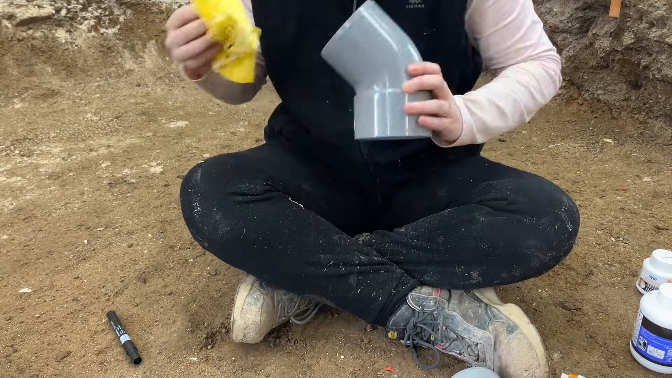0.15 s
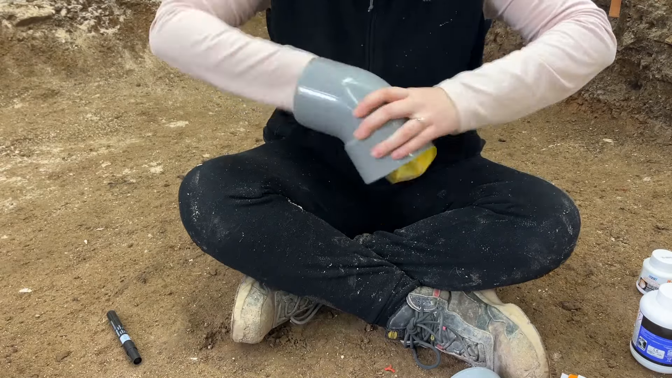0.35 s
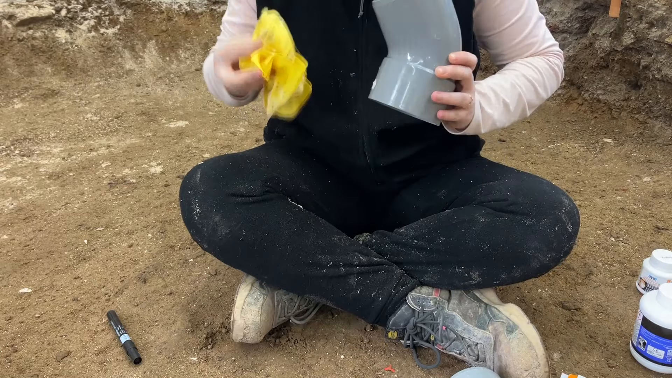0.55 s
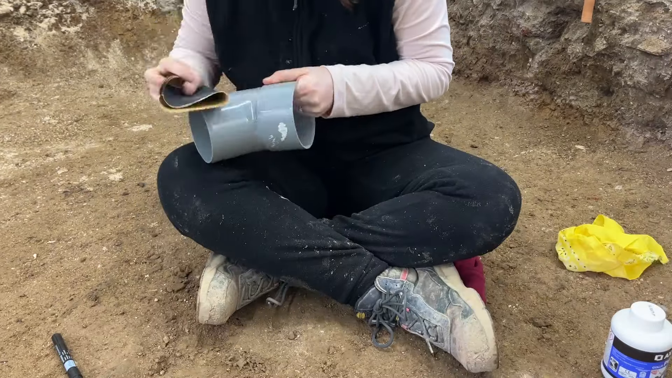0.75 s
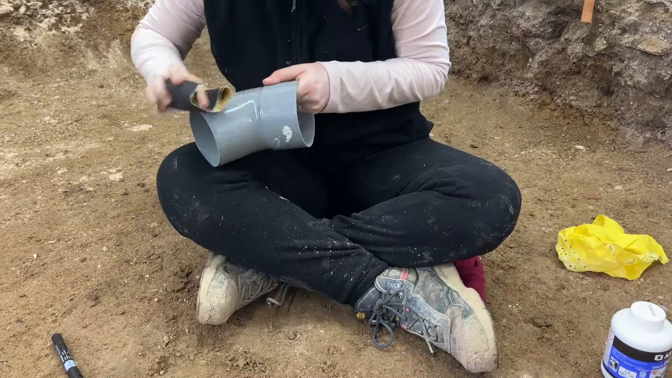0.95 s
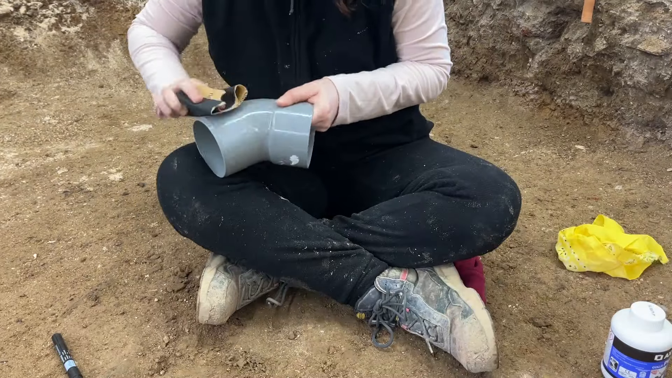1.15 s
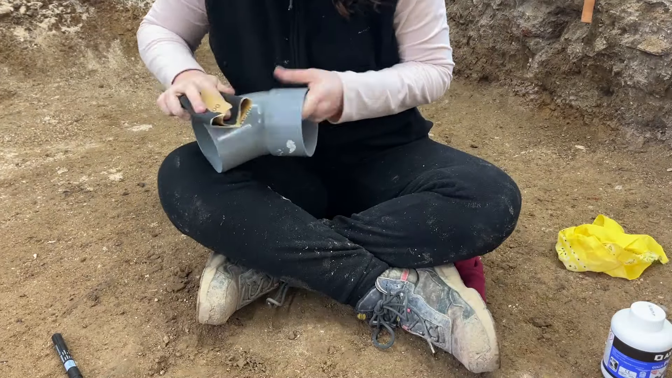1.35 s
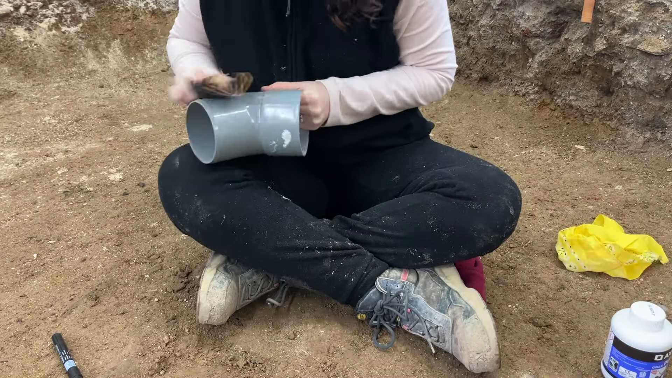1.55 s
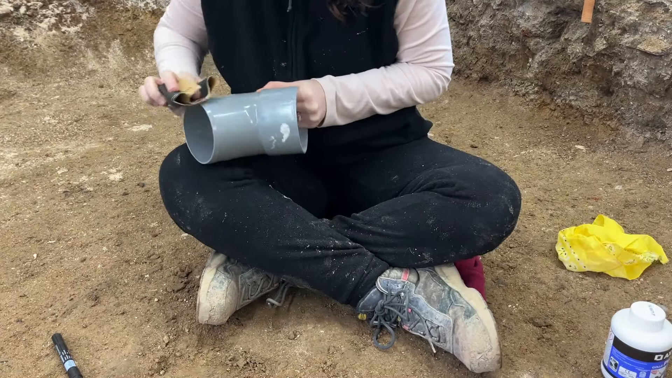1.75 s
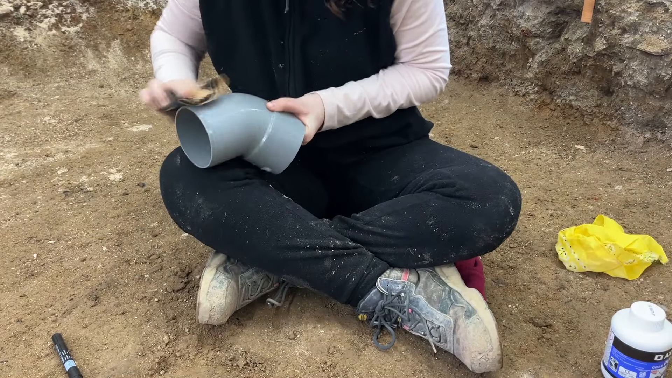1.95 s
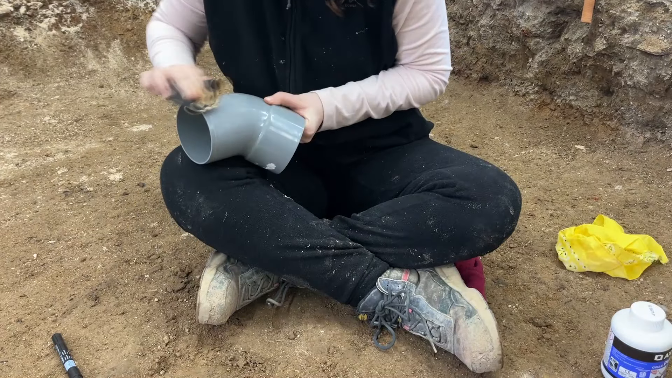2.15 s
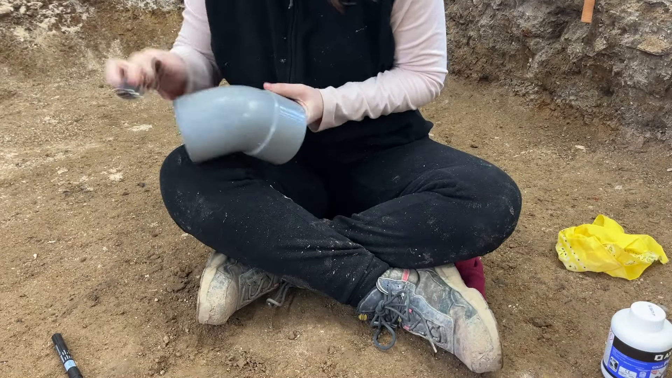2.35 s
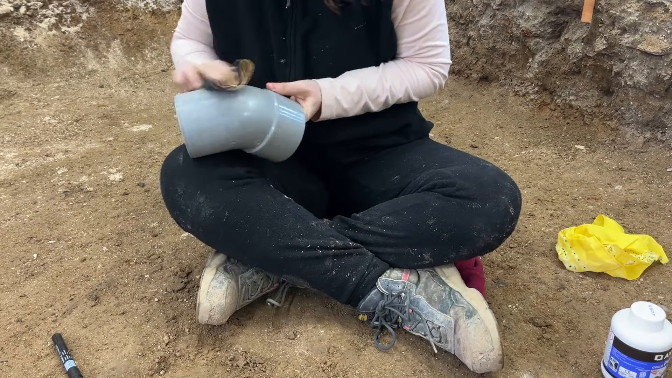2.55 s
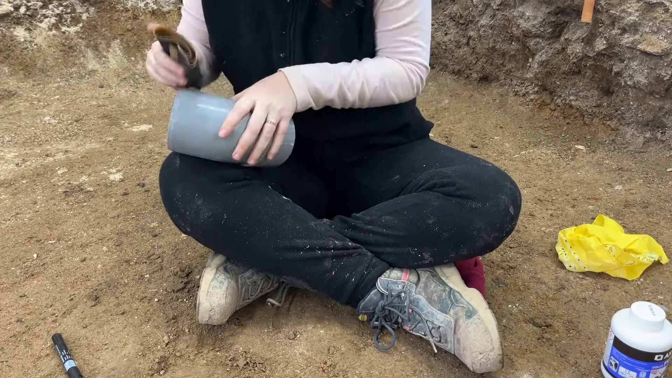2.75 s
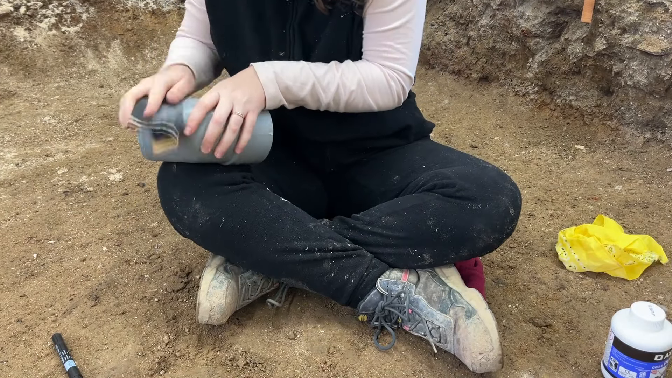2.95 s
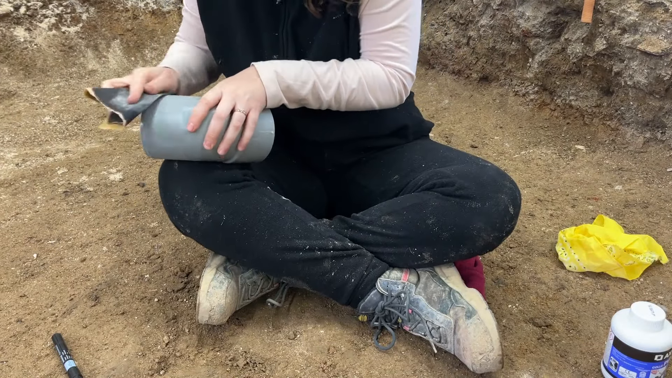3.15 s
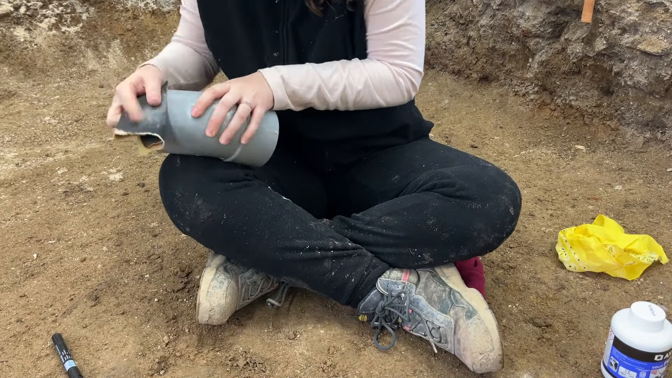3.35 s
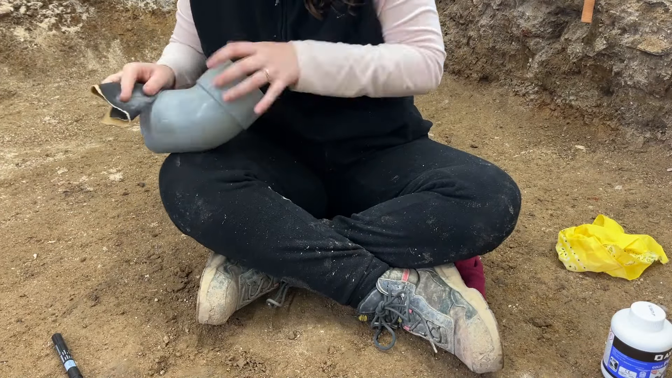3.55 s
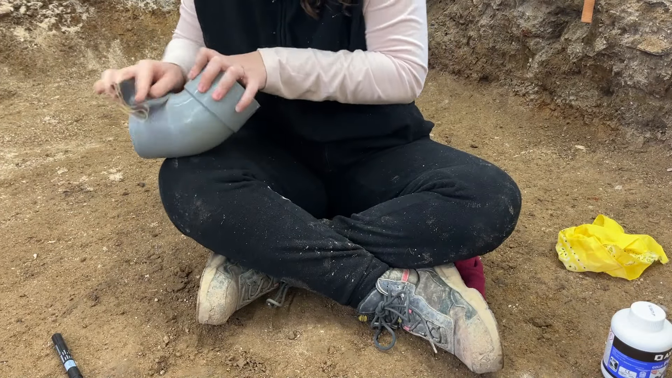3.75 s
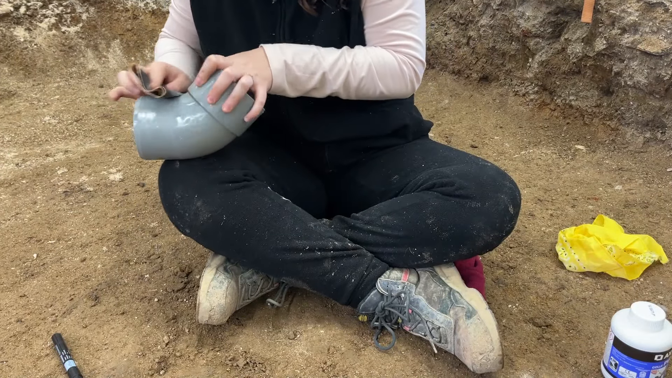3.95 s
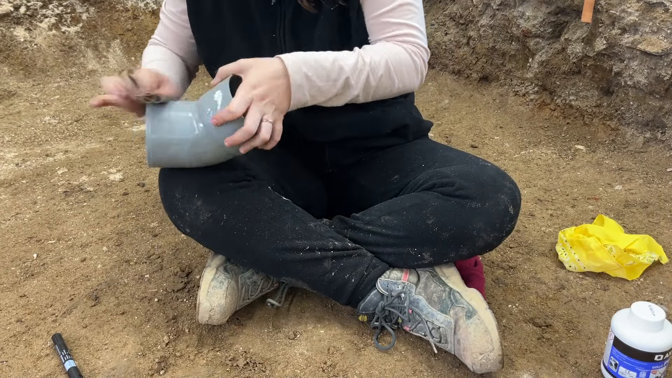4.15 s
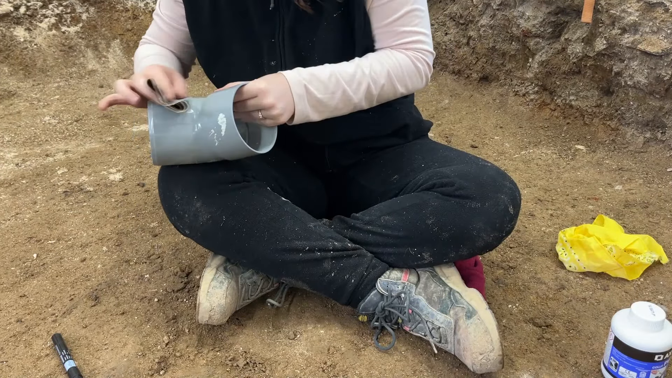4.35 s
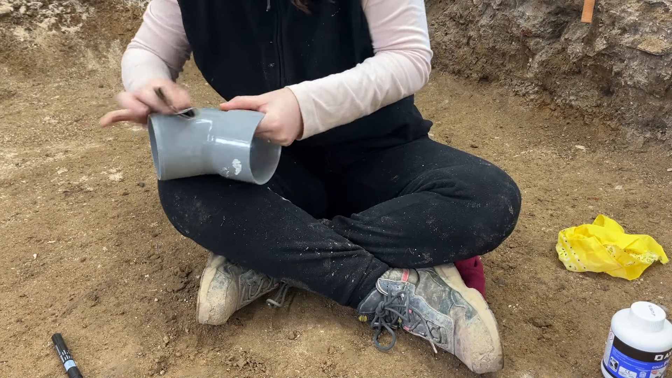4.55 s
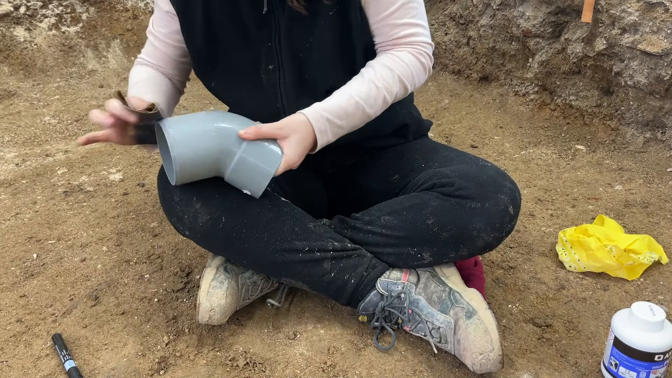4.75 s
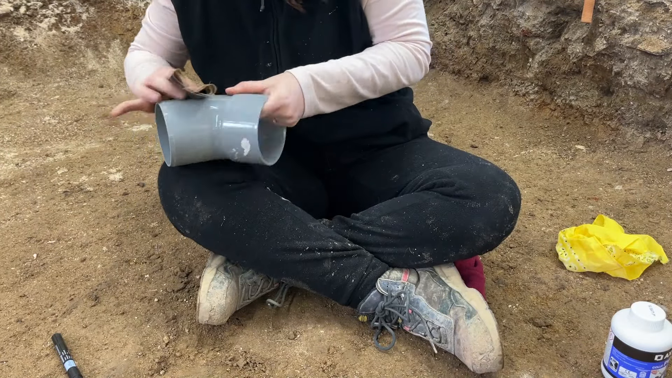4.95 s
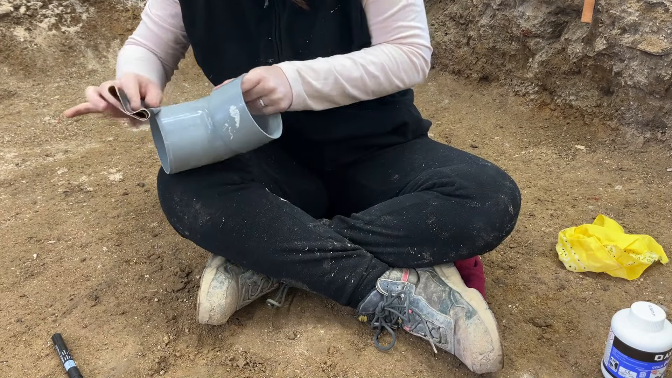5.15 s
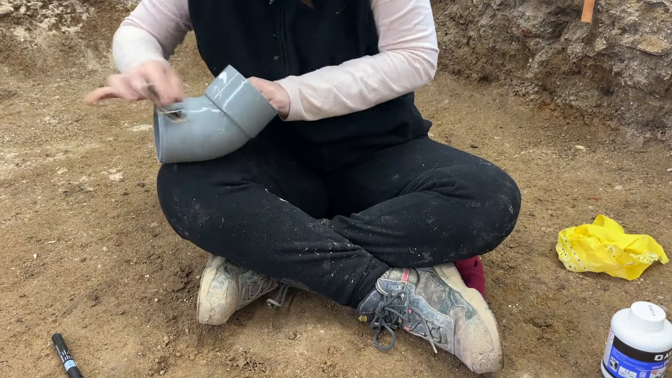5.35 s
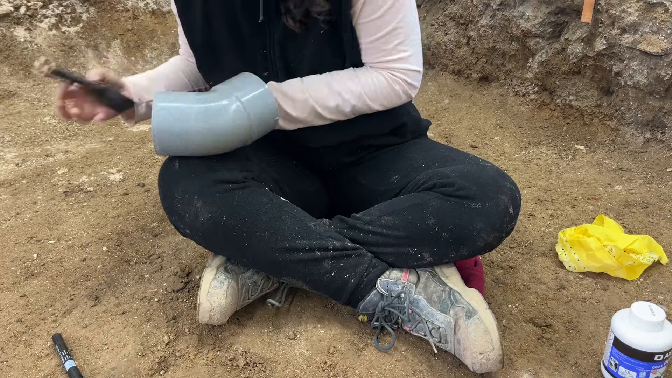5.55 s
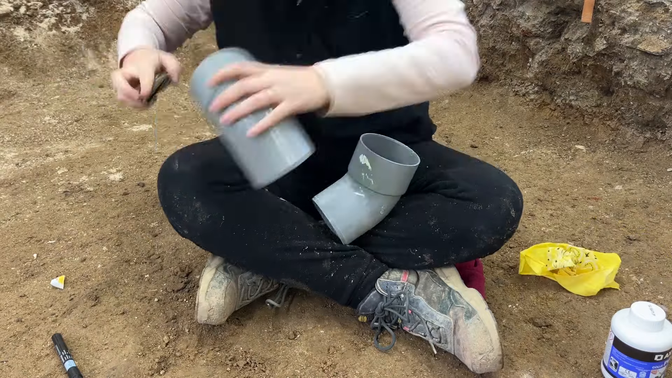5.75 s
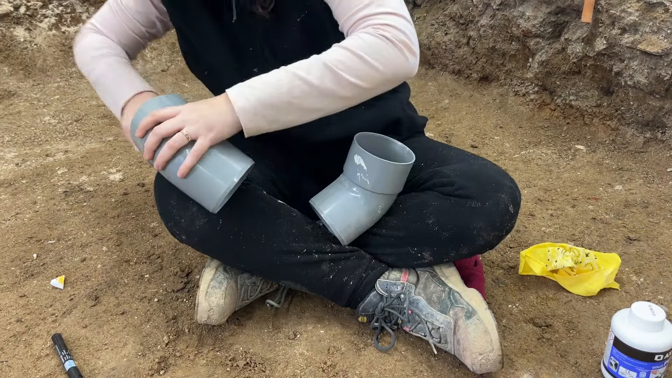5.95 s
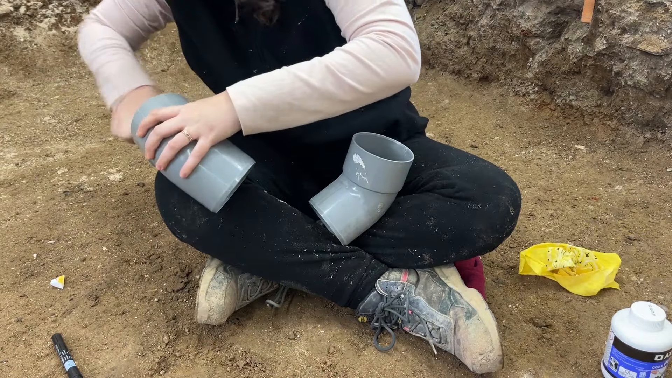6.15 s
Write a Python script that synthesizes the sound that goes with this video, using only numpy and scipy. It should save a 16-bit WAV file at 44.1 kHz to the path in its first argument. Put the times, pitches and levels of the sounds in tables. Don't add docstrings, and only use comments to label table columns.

```python
import sys
import numpy as np
from scipy import signal
from scipy.fft import rfft, irfft
from scipy.io import wavfile
from scipy.ndimage import uniform_filter1d

SR = 44100
rng = np.random.default_rng(int(sys.argv[2]) if len(sys.argv) > 2 else 0)


def wrap_up_sound(samples):
    columns = np.atleast_2d(samples).T
    tamed = np.clip(columns, -1, 1)
    steps = np.round(tamed * 32767).astype(np.int16)
    wavfile.write(sys.argv[1], SR, steps)


def ratio_of_db(decibels):
    return 10 ** (np.asarray(decibels, float) / 20)


N = 277389
TIME = np.arange(N) / SR
HZ = np.fft.rfftfreq(N, 1 / SR)

# f/Hz, level/dB
HUSH_COLOUR = [(100, -4), (200, -3), (400, -4.5), (650, -9.5), (1200, -18), (1500, -14.5), (1850, -14.5),
               (2500, -24), (2900, -28), (15500, -42)]
# f/Hz, level/dB
BUFFET_COLOUR = [(12, -46), (25, 5), (50, 2), (100, 1), (160, -9.5), (300, -23), (600, -69)]
# middle t/s, half length t/s, drone level/dB, drone f/Hz
WIND_GUSTS = [(0.136, 0.074, -46, 62.9), (.4, 0.17, -53.5, 61), (0.824, 0.042, -55, 70.8),
              (1.205, 0.44, -60.5, 64.8), (1.786, 0.084, -48, 66), (2.077, 0.14, -45.5, 64.5),
              (2.263, 0.089, -40, 69.8), (2.502, 0.14, -40, 56.6), (2.74, 0.31, -40, 57.9),
              (2.94, .05, -48.5, 65), (3.21, 0.14, -54, 68.5), (3.413, 0.045, -42, 68.3),
              (3.496, 0.043, -38, 67.36), (3.643, 0.088, -45.5, 63), (3.888, 0.083, -43.5, 68.4),
              (4.05, 0.098, -47, 57.14), (4.164, 0.027, -33, 57.24), (4.252, 0.036, -28.5, 66.8),
              (4.33, 0.019, -35.5, 58.4), (4.451, 0.084, -48.5, 71.1), (4.66, 0.074, -42.5, 70.3),
              (4.792, 0.039, -50, 68.2), (5.261, 0.031, -56, 67.1), (5.522, 0.11, -57.5, 54.5)]
# f/Hz, likeness/0-1, phase lead/rad, level/dB
PORT_DIFFERENCE = [(150, .98, -.1, -1.5), (700, .82, -.1, -4), (1200, .56, -.3, -1.4),
                   (1550, .3, -2.1, -.8), (1900, .9, -.15, -.3), (3100, .66, -1.25, -3.5),
                   (4000, .57, -.35, -6), (5000, .57, .1, -5.6), (5700, .71, 1.1, -5),
                   (6700, .77, 1.5, -1.5), (8400, .93, 3.14, 0), (10200, .76, 4.85, 0),
                   (11800, .93, 6.28, 0), (13600, .76, 7.7, 0), (15400, .93, 9.42, 0)]
# f/Hz, width/Hz, level/dB
HOLLOW_MODES = [(700, 120, 0), (1320, 170, -4), (2270, 250, -9)]
# t/s, peak level/dB, favoured f/Hz, reach/octaves
ELBOW_KNOCKS = [(0.335, -50, 1320, 3.2), (0.423, -57, 600, 0.6), (0.685, -46.5, 674, 0.57),
                (0.774, -44, 2500, 3.4), (0.858, -44.5, 900, 1.7), (0.918, -40, 3500, 4.2),
                (1.011, -37, 764, 3.8), (1.066, -34, 1060, 0.84), (1.435, -26.5, 780, 1.9),
                (1.463, -35, 1310, 1.2), (1.532, -36.5, 2600, 1.26), (1.618, -41.5, 750, 1.6),
                (1.686, -27, 1360, .7), (1.706, -32, 798, 1.5), (1.732, -42, 750, 1.3),
                (1.8138, -23, 5630, 2.14), (1.863, -32, 1300, 1.4), (1.914, -32, 1020, 2.5),
                (1.923, -33, 700, 0.98), (2.278, -42, 800, 1.26), (2.498, -30.5, 2200, 3.3),
                (2.633, -38, 1170, 0.63), (2.674, -42.5, 4970, 0.99), (2.863, -34.5, 3500, 3),
                (3.156, -40, 2800, 3.3), (4.062, -46.5, 855, 1.1), (4.17, -47.5, 700, 0.84),
                (4.786, -35.5, 1296, 2.8), (5.274, -52, 700, 1), (5.76, -47.5, 4260, 2.9)]
# t/s, peak level/dB
FINGER_TAPS = [(.662, -45.5), (.673, -57), (.978, -42), (.986, -45), (1.045, -43), (2.03, -50), (2.65, -50),
               (4.15, -50.5), (4.641, -61), (5.1, -56), (5.215, -58), (1.1, -47), (1.172, -49),
               (1.15, -48.5), (2.336, -53.5), (3.664, -52), (4.031, -53), (4.274, -50), (4.364, -56),
               (4.419, -47.5), (4.456, -52), (4.574, -53.5), (4.663, -53.5), (4.756, -51), (5.03, -56),
               (5.118, -54), (5.3, -56), (5.425, -53), (5.487, -54)]
# t/s, hollow ring level/dB, brightness level/dB
HOLD = [(0, 12, 3), (.5, -6, -12), (.8, 8, -4), (1.2, 1, 1.5), (1.65, -1, -0.5), (1.72, 13, -13.5),
        (2, 7.5, -0.5), (2.3, 0.5, 3), (2.6, 8, -6), (2.85, -1, -10), (3.3, -4, -5.5), (3.7, -10, -6),
        (4.1, -4.5, -2), (4.9, -16.5, -2.5), (5.4, -9.5, -0.5), (5.62, -13.5, -14), (5.85, 9.5, -14.5),
        (6.29, -4.5, -6.5)]
# f/Hz, level/dB
GRIT_COLOUR = [(150, -17), (400, -19.5), (1500, -14.5), (1900, -8.5), (2400, -3.5), (3800, -2),
               (6600, -3.5), (7700, -0.5), (8800, -1.5), (10100, -4), (11000, 0), (13200, -3), (15700, -4),
               (15850, -66)]
# first t/s, last t/s, first level/dB, last level/dB
STROKE_RUNS = [(0.638, 0.708, -38, -39), (0.921, 1.104, -38, -37), (1.12, 1.209, -40, -39.5),
               (1.231, 1.362, -36.5, -37), (1.425, 1.501, -38.5, -37.5), (1.568, 1.601, -43, -37),
               (1.623, 1.67, -37, -38.5), (1.688, 1.734, -43, -43.5), (1.76, 1.797, -48, -48),
               (1.87, 2.098, -44, -39), (2.116, 2.276, -41.5, -41), (2.427, 2.476, -42.5, -43),
               (2.513, 2.536, -47.5, -46.5), (2.554, 2.621, -40.5, -43.5), (2.942, 3.013, -37.5, -36.5),
               (3.032, 3.287, -39, -44), (3.357, 3.465, -43.5, -42.5), (3.519, 3.535, -59, -71),
               (3.657, 3.782, -39, -40.5), (3.803, 4.048, -41.5, -41.5), (4.067, 4.183, -46, -43.5),
               (4.251, 4.494, -46, -42), (4.512, 4.656, -42, -43), (4.690, 4.794, -42, -38),
               (4.81, 5.061, -40, -41), (5.084, 5.272, -43.5, -45), (5.297, 5.434, -46, -44),
               (5.954, 6.081, -48, -46.5), (6.108, 6.171, -45, -47), (6.19, 6.285, -44.5, -44)]
STROKE_COUNTS = [6, 12, 6, 7, 4, 3, 4, 4, 3, 15, 11, 3, 2, 5, 4, 13, 6, 2, 6, 14, 8, 17, 11, 8, 16, 9, 6, 5,
                 4, 6]
# t/s, peak level/dB, half length/ms
PAPER_FLICKS = [(0.0, -52, 15.5), (0.112, -60.5, 5), (0.636, -38.5, 11), (2.646, -52.5, 30),
                (1.540, -42, 10), (1.399, -40.5, 3.8), (1.436, -33, 3.1), (1.583, -34, 5.8),
                (1.815, -25.5, 1.7), (1.826, -40, 5.5), (1.866, -28.5, 2.4), (1.905, -50, 14),
                (0.622, -55, 4), (3.636, -47.5, 6.4), (2.345, -64.5, 40), (2.499, -43, 7.5),
                (4.678, -43, 12), (2.675, -37, 3.8), (2.810, -41.5, 9.3), (2.869, -41, 12.4),
                (2.897, -40, 10.4), (2.925, -45, 15), (3.320, -52, 14.7), (3.370, -37, 6),
                (3.486, -38, 8.95), (4.198, -40.5, 6.8), (4.286, -42.5, 8.9), (5.766, -46.5, 4.9),
                (5.881, -45, 5.9), (5.890, -53.5, 27.5)]
# t/s, peak level/dB, half length/ms
LIGHT_TOUCHES = [(0.22, -57, 10), (.245, -61, 19), (.294, -55, 16), (0.336, -58, 17), (.395, -58, 25),
                 (0.444, -56.5, 7.5), (0.743, -48.5, 7.4), (0.781, -51, 8.6), (0.803, -47, 8.7),
                 (0.836, -46, 7.2), (.859, -53, 8), (0.887, -49, 11.8), (2.703, -48, 5.7), (2.721, -47, 8),
                 (2.76, -59.5, 53), (3.552, -57.5, 15.2), (3.607, -56, 21.5), (5.467, -48.5, 6.8),
                 (5.482, -47, 11), (5.521, -50, 11.4), (5.556, -49, 9), (5.592, -50, 5), (5.616, -53.5, 12),
                 (5.66, -61, 15), (5.692, -50, 10), (5.72, -60, 7.1), (5.74, -61.5, 9.3), (5.796, -61, 14),
                 (5.84, -60.5, 18), (2.846, -45.5, 6.2)]


def evened(x):
    return x / np.sqrt(np.mean(x ** 2) + 1e-20)


def read(points, column=1):
    table = np.transpose(points)
    return np.interp(np.log(HZ + 1), np.log(table[0] + 1), table[column])


def curves(rows):
    t, *columns = np.transpose(rows)
    return [np.interp(TIME, t, column) for column in columns]


def coloured(x, spectrum):
    return evened(irfft(rfft(x) * ratio_of_db(read(spectrum)), N))


def resonate(x, hz, width):
    turn = np.exp(2j * np.pi * np.cumsum(hz * np.ones(len(x))) / SR)
    r = np.exp(-np.pi * width / SR)
    return 2 * (turn * signal.lfilter([1 - r], [1, -r], x / turn)).real


def wander(span_s):
    size = max(int(span_s * SR), 1)
    smoothed = uniform_filter1d(rng.standard_normal(N), size)
    return evened(uniform_filter1d(smoothed, size))


def ports(x, other):
    same = np.clip(read(PORT_DIFFERENCE, column=1), 0, 1)
    shift = np.exp(1j * read(PORT_DIFFERENCE, column=2))
    right = same * shift * rfft(x) + np.sqrt(1 - same ** 2) * rfft(other)
    return np.array([x, irfft(right * ratio_of_db(read(PORT_DIFFERENCE, column=3)), N)])


def hush(level_db=-67.5):
    left, other = [coloured(x, HUSH_COLOUR) for x in rng.standard_normal((2, N))]
    return ratio_of_db(level_db) * ports(left, other)


def gusts(calm_db=-83, edge_db=-7.5):
    middle, half_s, db, hz = np.transpose(WIND_GUSTS)[:, :, None]
    t = TIME[::64]
    swell = ratio_of_db(db + edge_db * ((t - middle) / half_s) ** 2)
    power = (swell ** 2).sum(axis=0) + ratio_of_db(calm_db) ** 2
    pitch = np.interp(TIME, middle[:, 0], hz[:, 0])
    return pitch, np.interp(TIME, t, 10 * np.log10(power))


def wind(unsteady=0.06, flutter_db=2.0, follows=0.27):
    hz, level_db = gusts()
    turns = np.cumsum(hz * (1 + unsteady * wander(0.015))) / SR
    strength = np.sqrt(2) * ratio_of_db(level_db - 5.0 + flutter_db * wander(0.0062))
    drone = strength * np.sin(2 * np.pi * turns)
    shared, own = [coloured(x, BUFFET_COLOUR) for x in rng.standard_normal((2, N))]
    gust = ratio_of_db(follows * (level_db + 61.0) - 58.5)
    together = ratio_of_db([[.7], [-.7]]) * (drone + gust * shared)
    return together + 0.15 * gust * own * [[1], [-1]]


def knocks(blow_ms=3.0, rise_ms=0.4, hardness=1.11, damping=2.78, low_damping=2.02,
           slap_db=1, slap_width=0.52, scatter_db=-3):
    t, out = np.arange(1500) / SR, np.zeros((2, N + 1500))
    tick_band = signal.butter(2, [2600, 8000], "band", fs=SR, output="sos")
    rows = ELBOW_KNOCKS + [(s, db, 684, 1) for s, db in FINGER_TAPS]
    part_hz = np.array([f for f, _, _ in HOLLOW_MODES] + [4500])
    for (s, db, hz, reach), draw in zip(rows, rng.standard_normal((len(rows), 1503))):
        ms = t * 1000 * reach ** hardness
        shape = np.exp(-ms / blow_ms) * (1 - np.exp(-ms / rise_ms))
        blow = draw[3:] * shape
        parts_db = -12 * (np.log2(part_hz / hz) / reach) ** 2
        modes = [(f * (1 + .02 * d), damping * w) for (f, w, _), d in zip(HOLLOW_MODES, draw)]
        modes[0] = modes[0][0], low_damping * HOLLOW_MODES[0][1]
        parts = [resonate(resonate(blow, *mode), *mode) for mode in modes]
        parts.append(signal.sosfilt(tick_band, blow))
        sound = sum(ratio_of_db(db + part_db + 5.5) * part / abs(part).max()
                    for part_db, part in zip(parts_db, parts))
        slap = resonate(blow, hz, hz * reach * slap_width)
        sound = sound + ratio_of_db(db + slap_db) * slap / abs(slap).max()
        paths = draw[:2:-1] * np.exp(-t * 1000)
        scattered = evened(signal.oaconvolve(sound, paths)[:1500])
        scattered = scattered * sound.std() * ratio_of_db(scatter_db)
        out[:, int(s * SR):][:, :1500] += [sound, scattered]
    return ports(*out[:, :N])


def strokes(stroke_ms=4.18, stretch=.25, return_db=-0.5, uneven_db=1.1, late_ms=.8):
    rows = PAPER_FLICKS + LIGHT_TOUCHES
    draws = rng.standard_normal((len(STROKE_RUNS), 2, 48))
    for (first, last, first_db, last_db), count, draw in zip(STROKE_RUNS, STROKE_COUNTS, draws):
        along = np.linspace(0, 1, count)
        late, force = draw[:, :count]
        s = first + (last - first) * along + late * late_ms / 1000 * np.sin(np.pi * along)
        db = first_db + (last_db - first_db) * along + uneven_db * force
        db = db + return_db * (np.arange(count) % 2)
        spacing_ms = 1000 * (last - first) / (count - 1)
        rows += zip(s, db, np.full(count, stroke_ms + stretch * spacing_ms))
    return rows


def pressure(rows, longer_ms):
    power = np.zeros(N)
    for s, db, half_ms in rows:
        near = slice(max(int((s - .09) * SR), 0), int((s + .09) * SR))
        away = abs(TIME[near] - s) * 1000 / max(half_ms + longer_ms, 1)
        power[near] += ratio_of_db(db - 6.5 * away ** 2.5) ** 2
    return np.sqrt(power)


def catches(per_s, spread_db):
    size = ratio_of_db(spread_db * np.minimum(rng.exponential(1, N), 3.))
    return evened(size * (rng.random(N) < per_s / SR))


def patches(depth_db):
    field = rng.standard_normal((129, N // 128 + 3))
    field = uniform_filter1d(field, size=6, axis=0)
    return ratio_of_db(depth_db * evened(uniform_filter1d(field, size=3, axis=1)))


def patchy(x, gains):
    z = signal.stft(x, nperseg=256)[2]
    return evened(signal.istft(z * gains[:, :z.shape[1]], nperseg=256)[1][:N])


def scrub(smooth=0.61, tilt_hz=6000, contrast=1.12, linger_s=0.013, linger_db=-9, judder_db=1.4):
    hollow_db, bright_db = curves(HOLD)
    fine, coarse = catches(per_s=3900, spread_db=6.0), catches(per_s=58, spread_db=0.0)
    judder, bite = ratio_of_db(judder_db * wander(0.0045)), patches(depth_db=2.5)
    rows = strokes()
    quick = judder * pressure(rows, longer_ms=-1.66)
    press = judder * pressure(rows, longer_ms=0.4)
    sharp = quick * (quick / ratio_of_db(-72.0)) ** (contrast - 1)
    keep = np.exp(-1 / (linger_s * SR))
    lingering = signal.lfilter([1 - keep], [1, -keep], press ** 2)
    dull = np.sqrt(press ** 2 + ratio_of_db(2 * linger_db) * lingering)
    high_pass = signal.butter(2, tilt_hz, "high", fs=SR, output="sos")
    low_pass = signal.butter(2, tilt_hz, "low", fs=SR, output="sos")
    pair = []
    for hiss, sign in rng.standard_normal((2, 2, N)):
        grit = coloured(smooth * hiss + (1 - smooth) * fine * sign, GRIT_COLOUR)
        grit = patchy(grit, bite)
        high, low = signal.sosfilt(high_pass, grit), signal.sosfilt(low_pass, grit)
        face = dull * low * ratio_of_db(-bright_db / 2) - sharp * high * ratio_of_db(bright_db / 2)
        shake = np.minimum(dull, ratio_of_db(-39)) * (hiss + .8 * coarse * sign)
        ring = sum(ratio_of_db(db) * resonate(shake, f, w) / np.sqrt(w) for f, w, db in HOLLOW_MODES)
        body = ratio_of_db(3) * resonate(shake, 640, 2070) / 40
        pair.append(face + ratio_of_db(hollow_db + 19.5) * (ring + body))
    return ratio_of_db(-2.5) * ports(*pair)


def scene():
    return hush() + wind() + knocks() + scrub()


def top_cut(x):
    return signal.sosfilt(signal.butter(12, 15800, fs=SR, output="sos"), x)


def record(dry):
    return top_cut(dry)


dry = scene()
out = record(dry)
wrap_up_sound(out)
```